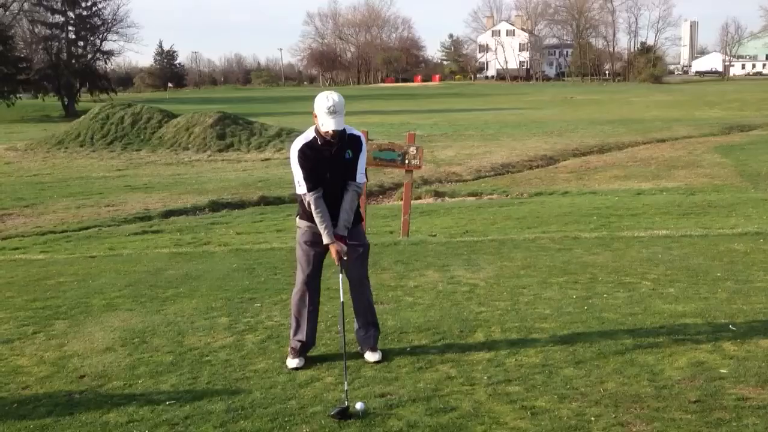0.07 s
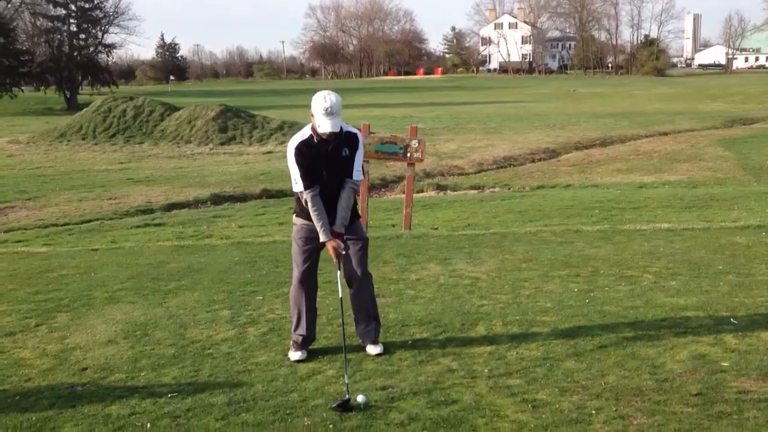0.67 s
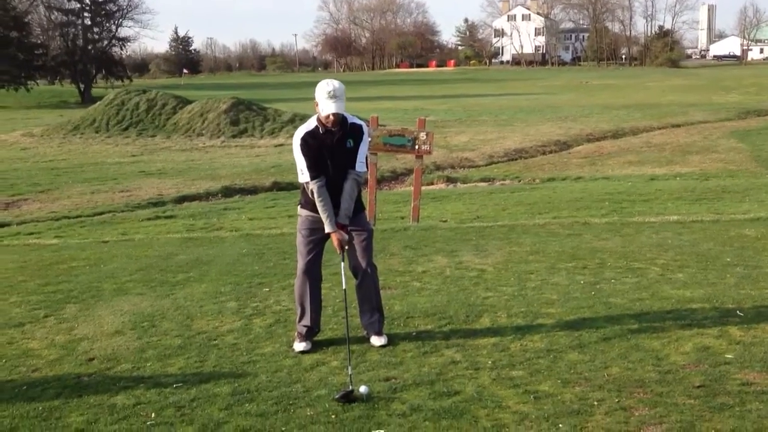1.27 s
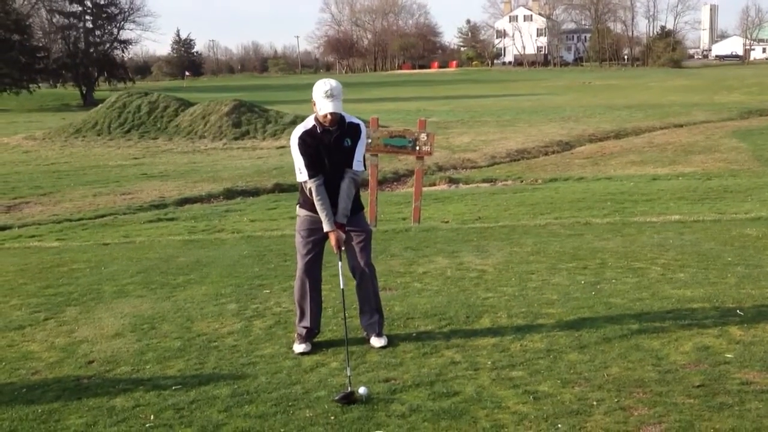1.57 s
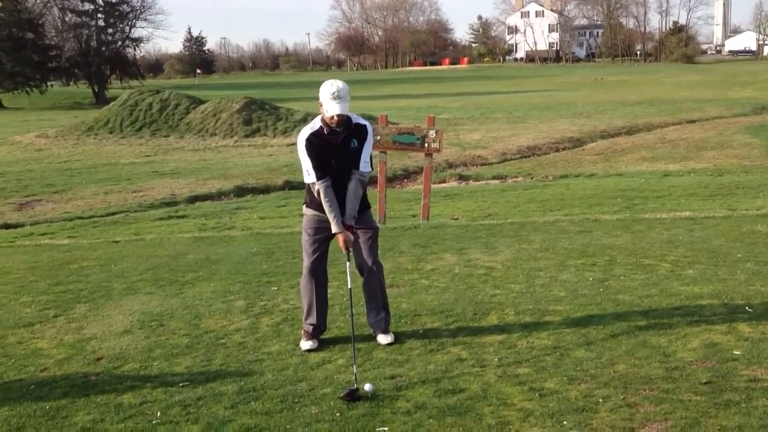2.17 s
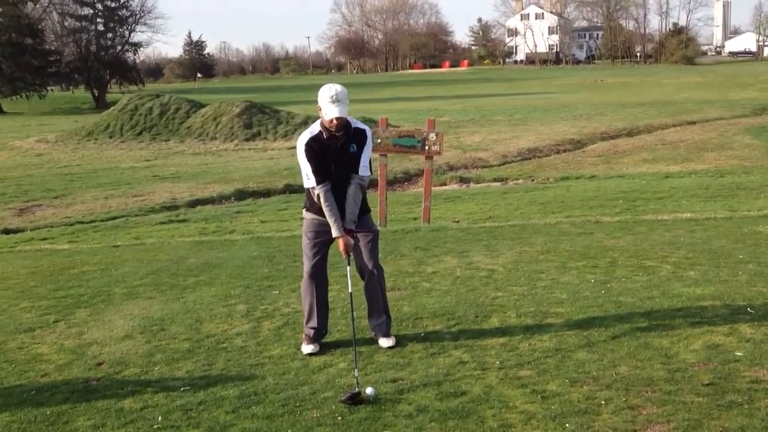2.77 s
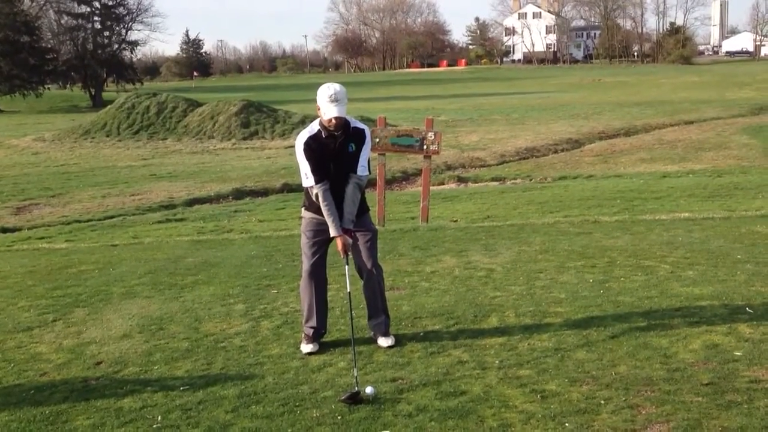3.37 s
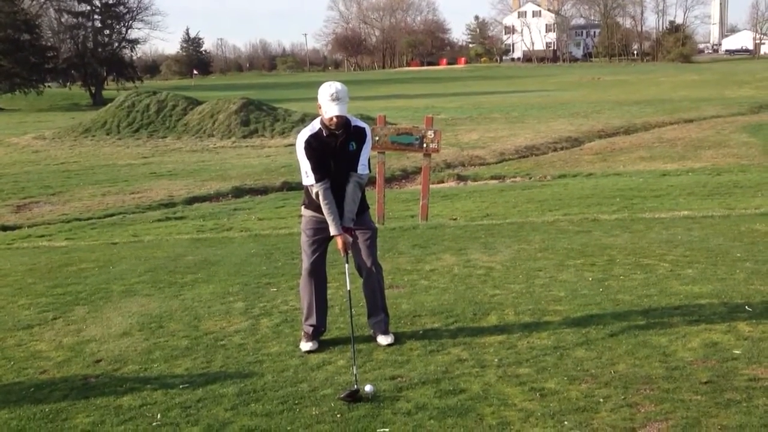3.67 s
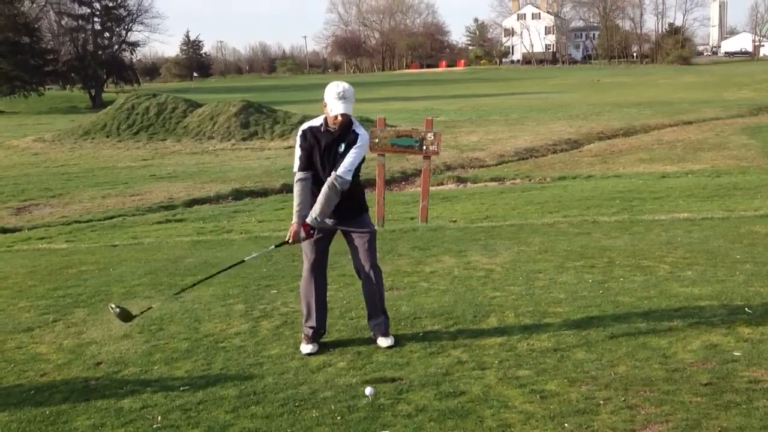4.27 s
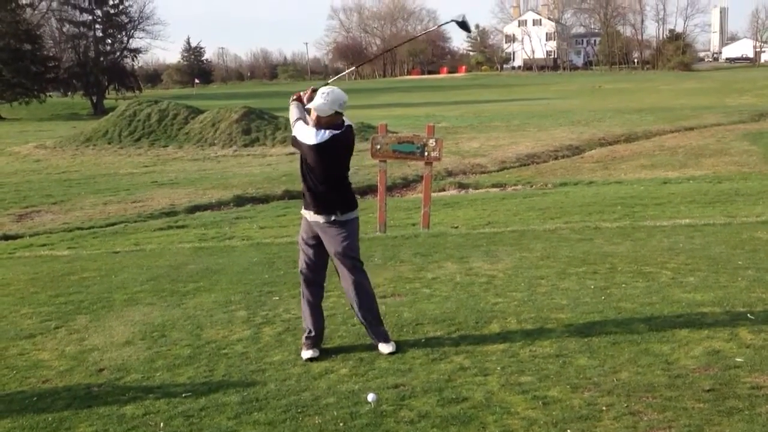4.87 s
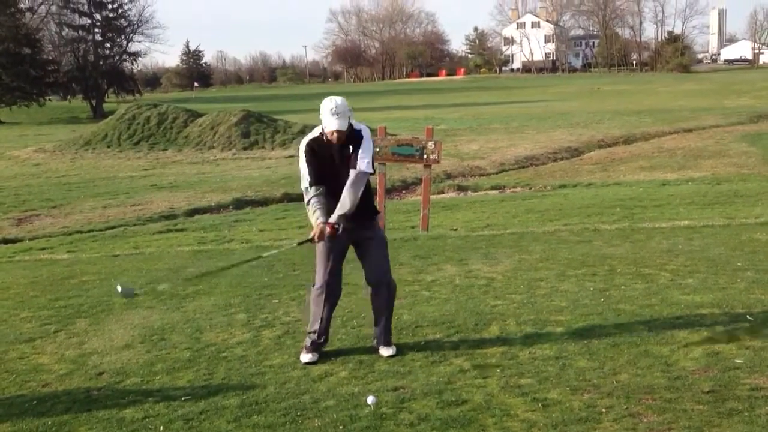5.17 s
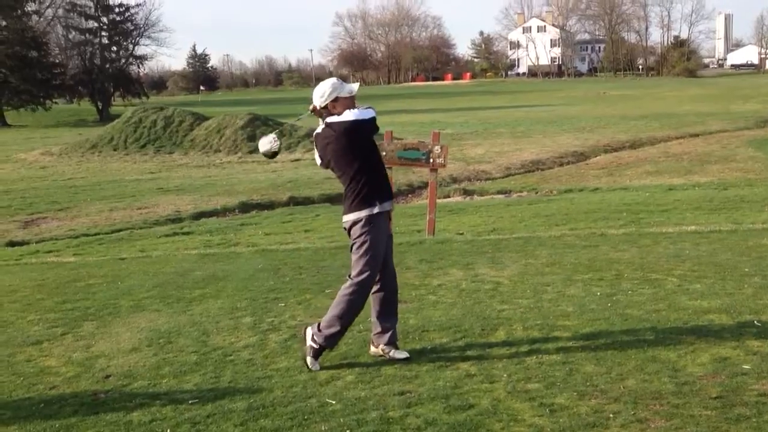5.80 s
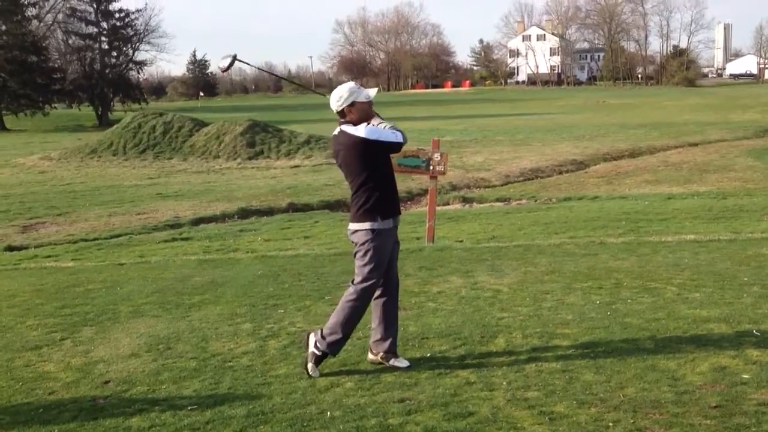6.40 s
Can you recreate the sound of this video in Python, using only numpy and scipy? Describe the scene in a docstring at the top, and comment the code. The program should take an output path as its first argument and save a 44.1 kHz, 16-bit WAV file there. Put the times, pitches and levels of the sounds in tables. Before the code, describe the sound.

Wind hits a small camera microphone on an open golf course. Through the first second it makes a lumpy low rumble with loud, rasping pops. It eases briefly, then buffets again from about 1.8 to 2.9 seconds before dropping to lighter puffs. Underneath lies a soft outdoor hush with a few barely audible, high, distant bird chirps, and a faint dry tick at about 3.4 seconds. At around 5.2 seconds a golf club swishes down a few metres away, and at 5.25 it strikes the ball with one loud, sharp crack. The hollow metal head gives a bright, very short ring that sags slightly in pitch, followed by a faint echo from far trees. The background dips under the hit and creeps back. Light wind rumble continues, with a couple of small pops near 6.3 seconds, until the end at about 6.5 seconds.

```python
"""A golf drive off the tee: the club swishes down, its hollow metal head cracks and rings,
and the ring sags in pitch as the follow-through carries it away. Ground and far trees answer.
A few metres off, wind eddies rumble, rasp and pop in a small camera's microphone port.
The camera's gain control ducks under the crack and creeps back.
Faint ticks and small birds sit over the hush of the open course."""
import sys
import numpy as np
from scipy import signal
from scipy.fft import rfft, irfft, next_fast_len
from scipy.io import wavfile
from scipy.ndimage import uniform_filter1d, minimum_filter1d, map_coordinates

SR = 44100
rng = np.random.default_rng(int(sys.argv[2]) if len(sys.argv) > 2 else 0)


def transcribe(signal):
    """Save signal, clipped to [-1, 1], as a 16-bit WAV file at the path in sys.argv[1]."""
    frames = np.atleast_2d(signal).T
    limited = np.clip(frames, -1, 1)
    pcm = np.round(limited * 32767).astype(np.int16)
    wavfile.write(sys.argv[1], SR, pcm)


N = 288414
T = np.arange(N) / SR
STRIKE_S = 5.2542
REFERENCE_EDGE_HZ = 2440  # edge at which steepness is 1; brighter pops rasp, snap and crunch louder

# Tone of the contact crack: (frequency [Hz], relative level [dB])
CRACK_EQ = [(200, -47.5), (500, -25), (1650, -12.5), (2650, -20), (3400, -6.5), (3800, -12), (4150, 3),
            (5200, -4), (7300, -5.5), (8480, -24.5), (9500, 3), (11800, -15), (14400, -12.5),
            (15500, -23.5), (16500, -66)]
# Tone of the thin crown's crowded modes: (frequency [Hz], relative level [dB])
CROWN_EQ = [(1000, -37.5), (3100, -29.5), (3900, -33), (4550, -10), (5250, -33), (6000, 1), (7100, -1.5),
            (9300, -3.5), (10800, -5.5), (11600, -11.5), (12900, -2), (13700, -23), (14900, -11),
            (16300, -45)]
# Ringing modes of the hollow head: (frequency [Hz], relative level [dB], t60 [s])
HEAD_MODES = [(1945, -39, .34), (3391, -7.5, .056), (3600, -17, .065), (4403, -14, .07), (4624, -37, .34),
              (4696, -3, .055), (4930, -27, .14), (5832, -15, .11), (5983, -6, .07), (6091, -7, .075),
              (6209, 0, .06), (6694, -12, .08), (6870, -16, .12), (7297, -11, .065), (7544, -12, .075),
              (7945, -12, .06), (8201, -9, .105), (8550, -16, .09), (8730, -18, .12), (9600, -14, .09),
              (9800, -13, .07), (10874, -9, .07), (12152, -14, .075), (12346, -13, .07), (13000, -16, .07),
              (15200, -22, .075)]
# Fader curve of the downswing: (time [s], relative level [dB])
SWING_FADER = [(5.06, -69), (5.17, -37.5), (5.222, -23.5), (5.25, -22), (5.262, -28.5), (5.30, -59)]
# Body of the swish: (frequency [Hz], relative level [dB])
SWISH_EQ = [(60, -10.5), (200, 6.5), (380, -2.5), (700, -10), (1100, -32.5), (2500, -36.5), (4500, -46),
            (6300, -54), (15000, -62)]
# Hiss of the thin shaft: (frequency [Hz], relative level [dB])
SHAFT_EQ = [(2500, -25.5), (4500, -0.5), (6300, -9), (9500, -1), (12000, -12.5), (14000, -6), (15500, -14)]
# Tone of the ground's reflection: (frequency [Hz], gain [dB])
GROUND_EQ = [(1000, -18), (1900, -1.5), (3300, -15), (4550, -5.5), (5500, -10.5), (7500, -11.5),
             (12000, -17)]
# Echoes off the tree line: (delay [s], send level [dB], spread [s])
TREE_ECHOES = [(.235, -45, 0.011), (.285, -47, .012), (.38, -35, .025)]
# Tone of those echoes: (frequency [Hz], gain [dB])
TREE_EQ = [(1000, -16), (3500, -15), (4350, -12), (4680, -9), (5000, -6), (5700, -27), (6150, -20),
           (6500, -7), (6950, -15), (7500, -22), (12000, -32)]

# Airflow between eddies: (time [s], relative rumble level [dB])
BREEZE_FADER = [(0.111, -28), (0.79, -32.5), (0.9, -33), (1.15, -30), (1.61, -31.5), (1.9, -29),
                (2.17, -25), (2.78, -33), (3.03, -38), (4.749, -41.5), (5.09, -39), (5.25, -45), (5.5, -48),
                (5.71, -36), (6.0, -39), (6.27, -36.5), (6.54, -39.5)]
# Strong eddies hitting the port: (time [s], rumble level [dB], half length [s], rasp level [dB])
STRONG_EDDIES = [(0.058, -12.5, 0.0016, -39), (0.087, -13.5, 0.0065, -18.5), (0.18, -18.5, 0.013, -25),
                 (0.347, -16.5, 0.0097, -26.5), (0.468, -10.5, 0.011, -23), (0.555, -18.5, 0.008, -24),
                 (0.588, -18, 0.017, -27), (0.668, -19, 0.0069, -32), (0.702, -14, 0.009, -23),
                 (0.8, -9.5, 0.0057, -18), (0.835, -15.5, 0.01, -38), (0.895, -19.5, 0.017, -29.5),
                 (0.933, -4.5, 0.0042, -25), (1.122, -19, 0.0065, -33), (1.167, -21, 0.006, -32.5),
                 (1.218, -22.5, 0.007, -49.5), (1.31, -22.5, 0.0075, -33.5), (1.428, -19.5, 0.009, -45),
                 (1.73, -25.5, 0.043, -55), (1.812, -22, 0.0085, -30), (1.863, -20.5, 0.009, -30),
                 (1.891, -12.0, 0.011, -18), (2.05, -22, 0.0085, -37.5), (2.128, -12, 0.0079, -35),
                 (2.22, -24.5, 0.01, -39), (2.31, -17, 0.0057, -42), (2.38, -17, 0.006, -49.5),
                 (2.472, -18.0, 0.019, -34.5), (2.518, -17, 0.0078, -47), (2.59, -17, 0.0065, -31.5),
                 (2.63, -19.5, 0.011, -35.5), (2.696, -13.0, 0.016, -21.5), (2.763, -17.5, 0.013, -37),
                 (2.847, -16.5, 0.017, -27.5), (2.912, -16.5, 0.0063, -41), (2.963, -23, 0.019, -51.5),
                 (3.094, -21.5, 0.0037, -55), (3.248, -22.5, 0.0084, -41), (3.525, -29.5, 0.015, -44),
                 (3.722, -25, 0.011, -54.0), (3.782, -21.5, 0.01, -48), (3.986, -23, 0.0082, -62),
                 (4.139, -16.5, 0.006, -33), (4.235, -28, 0.0078, -56.5), (4.309, -25.5, 0.0043, -42.5),
                 (4.389, -19.5, 0.0073, -51), (4.441, -21.5, 0.02, -46), (4.515, -25, 0.0068, -58),
                 (4.638, -24, 0.0052, -52), (4.788, -27.5, 0.013, -55.0), (4.879, -23.5, 0.0075, -46),
                 (4.925, -27.5, 0.0078, -53), (5.033, -20, 0.013, -48), (5.105, -30, 0.0024, -57.5),
                 (5.556, -20, 0.0085, -34), (5.6, -26, 0.013, -61), (5.665, -24.5, 0.0058, -61),
                 (5.779, -22.5, 0.0046, -44), (5.885, -26, 0.0064, -57.5), (5.997, -30.5, 0.00695, -56.0),
                 (6.07, -29.5, 0.0065, -56.5), (6.216, -19, 0.011, -31), (6.323, -20, 0.0045, -32),
                 (6.385, -27.5, 0.0054, -57.0), (6.461, -17, 0.0025, -55)]
# Low end of the wind in the port: (frequency [Hz], relative level [dB])
RUMBLE_EQ = [(20, -16), (40, -22.5), (80, -12.5), (125, -3.5), (180, 0), (330, -9), (490, -18),
             (940, -38.5), (2000, -67.5), (4000, -83)]
# Rasp of a hard eddy: (frequency [Hz], relative level [dB])
RASP_EQ = [(20, -28), (120, -15), (350, 7.5), (650, 15), (1000, 3), (1700, -16), (3000, -36.5), (4200, -47),
           (7000, -59.5), (15000, -93)]
# Tight vortices popping in the port: (time [s], peak level [dB], edge cutoff [Hz])
VORTEX_POPS = [(0.0615, -1, 2110), (.157, -8.5, 1995), (0.166, 2, 2910), (0.168, -10.5, 2640),
               (0.3403, -3, 1495), (0.4658, -10.5, 2270), (0.477, -9.5, 2350), (0.554, -12.5, 1750),
               (.662, -16, 1190), (0.703, -13.5, 1586), (0.768, -13.5, 1290), (0.7973, -8, 2410),
               (0.8042, -9, 1690), (0.888, -8, 598), (.898, -12.5, 1210), (0.9296, -0.5, 1610),
               (1.812, -17.5, 1480), (1.883, -16, 1980), (1.8949, -4.5, 1940), (2.121, -1, 476),
               (2.3, -12.5, 1130), (2.5898, -10, 1124), (2.724, -9, 1400), (2.764, -16, 980),
               (2.842, -16, 1100), (3.788, -22, 950), (5.777, -16, 895), (6.204, -23.5, 850),
               (6.3199, -13, 990)]
# Crunch around a steep vortex front: (frequency [Hz], relative level [dB])
CRUNCH_EQ = [(500, -14), (1200, 6), (2200, 2.5), (3200, -7), (4200, -20.5), (5200, -26), (6500, -37),
             (12000, -53.5)]

# Small dry ticks: (time [s], level before EQ [dB], low edge [Hz], high edge [Hz])
DRY_TICKS = [(0.8662, -53, 4170, 6000), (3.4453, -30.5, 1384, 2250), (3.683, -46, 1820, 2500)]
# Far bird notes: (time [s], length [s], start pitch [Hz], end pitch [Hz], relative level [dB], blur [Hz])
BIRD_NOTES = [(0.817, 0.059, 4160, 4250, -74.5, 49.7), (1.40, .032, 6250, 5900, -75, 110),
              (1.438, .054, 4150, 3950, -70, 45), (1.503, .2, 4840, 4780, -72, 45),
              (1.558, .16, 4470, 4630, -78, 60), (2.43, 0.057, 4250, 4100, -65.5, 231),
              (3.678, .02, 4480, 4370, -64, 131), (4.07, .07, 3750, 3750, -77, 45),
              (4.24, 0.08, 3450, 3400, -72, 40), (4.745, 0.026, 6200, 7200, -74, 320)]
# Tone of the countryside bed: (frequency [Hz], relative level [dB])
COUNTRYSIDE_EQ = [(30, -25), (150, 10), (500, -5.5), (1000, -2), (2000, -9.5), (2700, -17.5), (3500, -26),
                  (4600, -23.5), (5150, -31), (7500, -32.5), (10100, -37.5), (14500, -33)]


def strike():
    """Face meets ball: the ball's pock and a hard crack, then the crown's dense shimmer."""
    age = T - STRIKE_S
    pock = -pulse(STRIKE_S, body_hz=1594, q=3.2, edge_hz=2770, order=6)
    crack = even(noise(CRACK_EQ), span=.0004) * (age > 0) * np.exp(-(age / 0.0043) ** 2)
    crown = even(noise(CROWN_EQ), span=0.0025) * decay(STRIKE_S, t60=0.104)
    return amp(-3) * pock + amp(-1) * crack + amp(-12) * crown


def head_ring():
    """The hollow head's metallic tink: its modes bloom as the ball leaves, then die quickly."""
    t = T[:SR // 2]
    bloom = (1 - np.exp(-t / 0.0083)) ** 2
    ring = np.zeros(N)
    for hz, db, t60 in HEAD_MODES:
        # the head whips on and turns, which blurs each partial a little
        drift = .022 * np.cumsum(rng.standard_normal(len(t)))
        partial = np.sin(2 * np.pi * (hz * t + rng.uniform()) + drift)
        ring[round(STRIKE_S * SR):][:len(t)] += amp(db - 60 * t / t60) * bloom * partial
    return amp(-3) * ring


def follow_through(x, half_turn_s=.18, slowing_s=.13):
    """Doppler bend: the head circles away and back, slowing, so its pitch sags and rises again."""
    age = np.maximum(T - STRIKE_S, 0)
    receding_m_per_s = 32 * np.sin(np.pi * age / half_turn_s) * np.exp(-age / slowing_s)
    delay_samples = np.cumsum(receding_m_per_s) / 343
    return map_coordinates(x, [np.arange(N) - delay_samples], order=5)


def swish():
    """Shaft and head shed vortices, loudest at the bottom of the swing, where the shaft also hisses."""
    whoosh = fader(SWING_FADER) * swell(5.22, .2) * even(noise(SWISH_EQ), span=.01)
    hiss = amp(-53) * swell(STRIKE_S, .03) * noise(SHAFT_EQ)
    return whoosh + hiss


def echoes(x):
    """Open ground answers the crack softly, the tree line later."""
    def scatter(delay, db, spread):
        cloud = (rng.standard_normal(N) * swell(delay, spread))[:SR]
        return amp(db) * cloud / np.linalg.norm(cloud)
    ground = signal.fftconvolve(x, scatter(delay=0.066, db=-33.5, spread=0.043))[:N]
    trees = signal.fftconvolve(x, sum(scatter(*row) for row in TREE_ECHOES))[:N]
    return colour(ground, GROUND_EQ) + colour(trees, TREE_EQ)


def wind(flutter_db=4.5, sputter_db=15):
    """Low, lumpy airflow over the port; each eddy is a short swell with a rasping, sputtering core."""
    rumble_power = (fader(BREEZE_FADER) * amp(-0.98 + flutter_db * wobble(40))) ** 2
    rasp_power = rumble_power * amp(-19) ** 2
    for s, db, width, rasp_db in [*STRONG_EDDIES, *light_eddies()]:
        eddy_power = swell(s, width) ** 2
        rumble_power += amp(db) ** 2 * eddy_power
        rasp_power += amp(rasp_db) ** 2 * eddy_power ** 2
    for s, db, edge_hz in VORTEX_POPS:  # sharp vortices break up into more rasp
        steepness = edge_hz / REFERENCE_EDGE_HZ
        rasp_power += (amp(db - 14) * steepness * swell(s, 0.0049)) ** 2
    rasp = even(noise(RASP_EQ) * amp(sputter_db * wobble(260)), span=0.0071)
    rumble = even(noise(RUMBLE_EQ), span=0.015)
    return np.sqrt(rumble_power) * rumble + np.sqrt(rasp_power) * rasp


def light_eddies(gap_s=0.073, half_length_s=0.0067):
    """Light eddies drift by at loose intervals, riding the breeze's level: rows like STRONG_EDDIES."""
    time_jitter, level_jitter, size_jitter = rng.uniform(-1, 1, (200, 3)).T
    times = gap_s * (np.arange(200) + time_jitter / 2)
    flow_s, flow_db = np.transpose(BREEZE_FADER)
    db = -29 + 0.98 * np.interp(times, flow_s, flow_db - flow_db.mean()) - 0.5 * level_jitter
    widths = half_length_s * 2 ** size_jitter
    return np.column_stack([times, db, widths, db - 21])[times < T[-1]]


def pops():
    """The hardest vortices slap the port, each a low thump with a steep front."""
    return -sum(amp(db) * pulse(s, body_hz=233, q=2.8, edge_hz=edge_hz, order=5)
                for s, db, edge_hz in VORTEX_POPS)


def rim_snaps():
    """The steeper and harder a vortex's front, the louder it snaps and crunches on the port's rim."""
    snap, crunch_envelope = np.zeros(N), np.zeros(N)
    for s, db, edge_hz in VORTEX_POPS:
        steepness = edge_hz / REFERENCE_EDGE_HZ
        click = pulse(s, body_hz=4500, q=0.41, edge_hz=8200, order=8)
        snap += amp(-44 + 1.5 * db) * steepness * click
        crunch_envelope += amp(db - 35.5) * steepness ** 2 * swell(s + 0.001, 0.002)
    return snap + crunch_envelope * noise(CRUNCH_EQ)


def port(pressure, overload_db=1.5, leak_hz=161):
    """Hard gusts overload the capsule into a dull crunch; slow pressure leaks away, thinning the bass."""
    saturated = pressure / (1 + (pressure / amp(overload_db)) ** 4) ** (1 / 4)
    return colour(lowpass(saturated, 5000, order=3), [(leak_hz / 2, -7.5), (leak_hz, 0)])


def ticks():
    """Faint dull taps, each in its own band, with a trace of outdoor tail."""
    out = np.zeros(N)
    for s, db, low_hz, high_hz in DRY_TICKS:
        envelope = decay(s, t60=0.033) + amp(-10) * decay(s, t60=0.3)
        band = [(low_hz / 2, -20), (low_hz, 0), (high_hz, -2), (1.3 * high_hz, -12),
                (2 * high_hz, -16), (3.4 * high_hz, -28), (5 * high_hz, -60)]
        out += amp(db) * colour(rng.standard_normal(N) * envelope, band)
    return out


def birds():
    """Small birds call in thin sliding notes, blurred by distance."""
    out = np.zeros(N)
    for s, length, start_hz, end_hz, db, blur_hz in BIRD_NOTES:
        pitch = np.interp(T, [s, s + length], [start_hz, end_hz]) + blur_hz * wobble(450)
        envelope = amp(db + 5) * swell(s + length / 2, length / 3)
        flicker = 0.53 + .5 * wobble(110)
        out += envelope * flicker * np.sin(2 * np.pi * np.cumsum(pitch) / SR)
    return out


def countryside():
    """One gently wavering noise bed for distant traffic, trees and the microphone's own hiss."""
    return amp(-49.5 + 0.82 * wobble(1.9)) * noise(COUNTRYSIDE_EQ)


def amp(db):
    """Decibels to gain."""
    return 10 ** (np.asarray(db) / 20)


def colour(x, points):
    """EQ x through (frequency [Hz], gain [dB]) points joined on a log axis."""
    size = next_fast_len(len(x) + 8192)
    hz, db = np.transpose(points)
    gain = amp(np.interp(np.log(np.fft.rfftfreq(size, 1 / SR) + 1), np.log(hz), db))
    return irfft(rfft(x, size) * gain, size)[:len(x)]


def lowpass(x, corner_hz, order):
    """Roll off the top end."""
    return signal.sosfilt(signal.butter(order, corner_hz, fs=SR, output="sos"), x)


def noise(points):
    """Coloured noise of rms 1."""
    x = colour(rng.standard_normal(N), points)
    return x / np.sqrt(np.mean(x ** 2) + 1e-20)


def even(x, span):
    """Level out the swells of x that last longer than span seconds."""
    size = int(span * SR)
    power = uniform_filter1d(uniform_filter1d(x ** 2, size), size)
    return x / np.sqrt(np.abs(power) + 1e-4)


def wobble(rate):
    """Smooth random modulation, rate knots a second."""
    return map_coordinates(rng.standard_normal(int(N * rate / SR) + 4), [T * rate])


def fader(rows):
    """Gain per sample from (time [s], level [dB]) rows."""
    return amp(np.interp(T, *np.transpose(rows)))


def swell(s, width):
    """A bump around time s with exponential flanks."""
    return 1 / np.cosh(np.clip((T - s) / max(width, .002), -30, 30))


def decay(s, t60):
    """A hard attack at time s that dies by 60 dB in t60 seconds."""
    return (T >= s) * amp(-60 * np.maximum(T - s, 0) / t60)


def pulse(s, body_hz, q, edge_hz, order):
    """A sudden pressure push of peak 1 at time s; the higher q, the more it swings back."""
    size = SR // 20
    body = signal.lfilter(*signal.iirpeak(body_hz, q, fs=SR), signal.unit_impulse(size))
    shape = lowpass(body, edge_hz, order)
    out = np.zeros(N + size)
    out[round(s * SR):][:size] = shape / np.abs(shape).max()
    return out[:N]


def gain_control(x, ceiling_db, release_s):
    """A peak over the ceiling ducks the gain within a millisecond; then it creeps back."""
    excess = np.log(np.maximum(np.abs(x) / amp(ceiling_db), 1))
    fade = np.exp(-T / release_s)
    ducking = np.maximum.accumulate(excess / fade, axis=-1) * fade
    return x * uniform_filter1d(minimum_filter1d(np.exp(-ducking), size=25), size=25)


def scene():
    """The mono mix at the microphone: club and wind up front, the course behind."""
    club = follow_through(strike() + head_ring())
    gusts = port(wind() + pops()) + rim_snaps()
    return (club + echoes(club) + swish() + gusts + countryside() + birds() + ticks())[None]


def record(dry):
    """The camera's chain: bass cut, gain control and a steep band limit."""
    x = signal.sosfilt(signal.butter(3, 58, "highpass", fs=SR, output="sos"), dry)
    x = gain_control(x, ceiling_db=-3.5, release_s=1.15)
    return lowpass(x, 15500, order=24)


dry = scene()
out = record(dry)
transcribe(out)
```